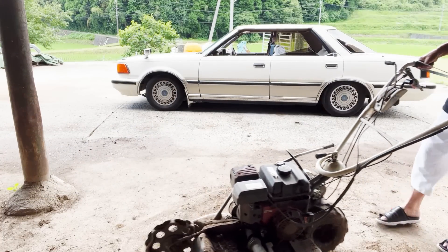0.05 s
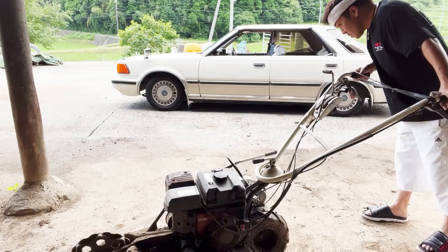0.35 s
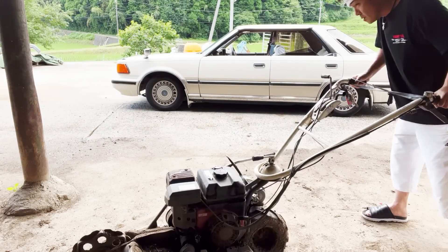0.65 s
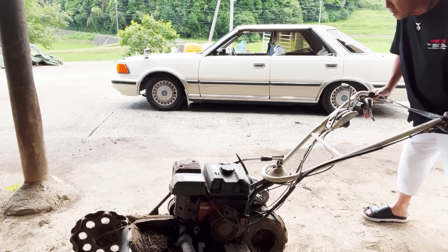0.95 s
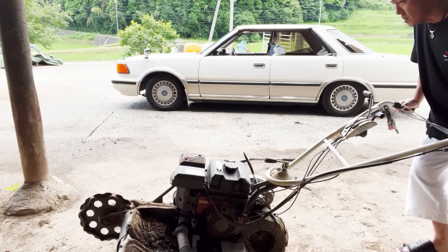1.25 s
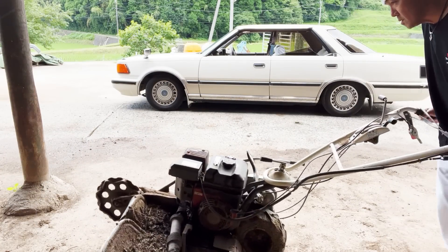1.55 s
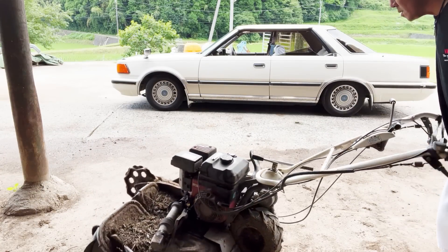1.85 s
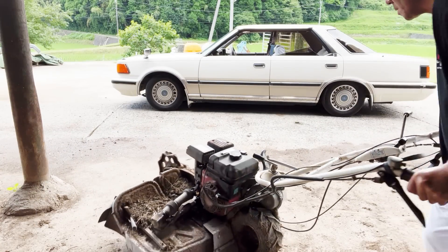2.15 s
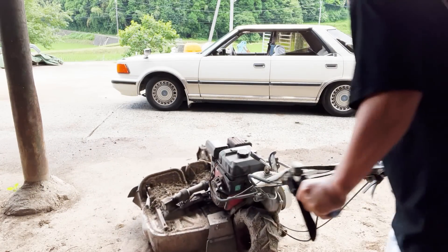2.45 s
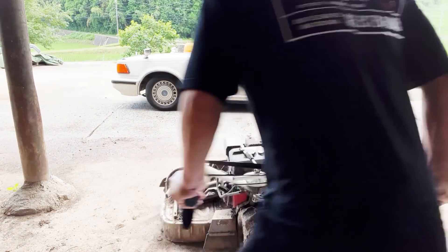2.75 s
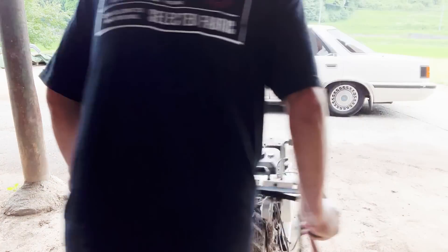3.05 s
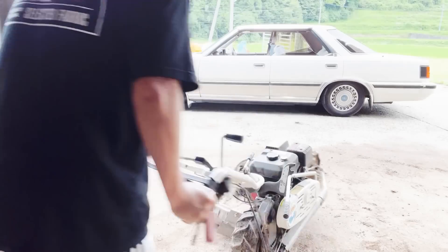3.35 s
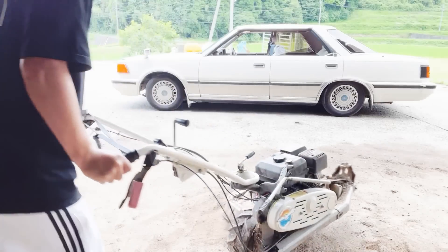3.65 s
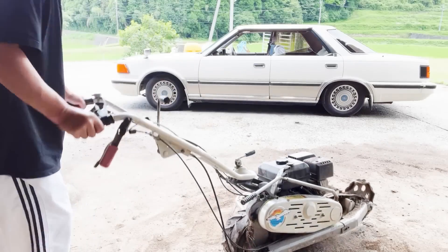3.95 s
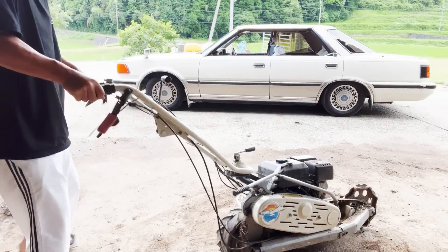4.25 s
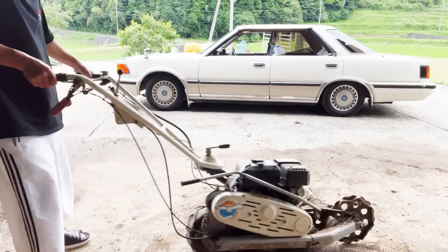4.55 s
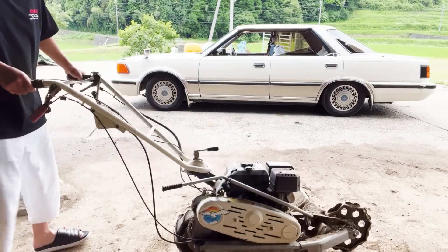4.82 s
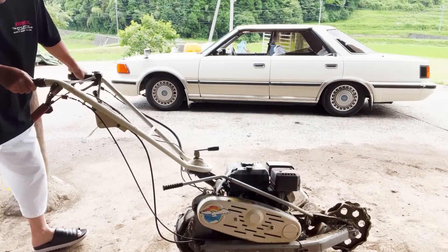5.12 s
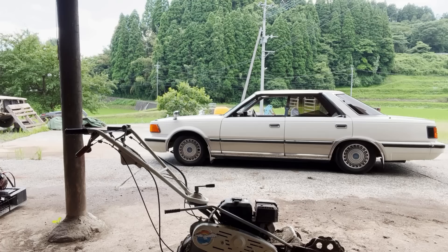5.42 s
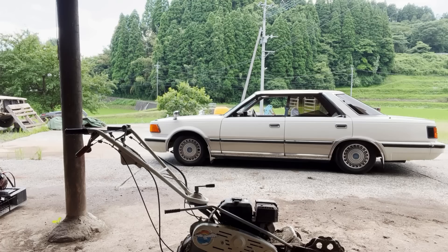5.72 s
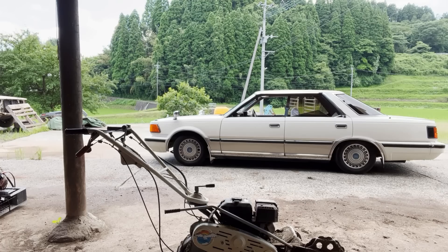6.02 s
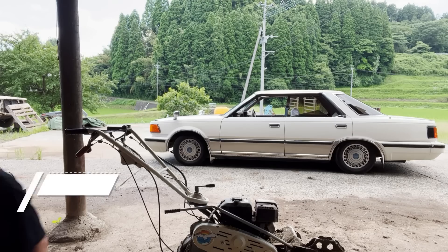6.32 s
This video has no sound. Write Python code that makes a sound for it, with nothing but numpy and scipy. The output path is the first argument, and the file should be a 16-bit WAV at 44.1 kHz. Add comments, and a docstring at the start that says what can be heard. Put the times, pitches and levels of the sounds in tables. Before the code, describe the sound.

Hollow sheet metal knocks, steel clanks and crunching sand as an unpowered tiller is shoved and turned in an open shed.

```python
"""A heavy walk-behind tiller, engine off, is pushed and turned by hand on the gritty concrete of an open farm
shed, while a far engine drones. The first shove makes its metal hood knock and its frame clank; the sound drops
away for a moment and a bird calls. More knocks follow, then a slow, quiet turn with sandals scuffing and grit
cracking under the tyres. After four seconds come the hardest jolts: the hood flexes and a lever pings. Near the
end something on hard wheels rolls closer, squealing faintly."""
import sys
import numpy as np
from scipy import signal
from scipy.fft import rfft, irfft, next_fast_len
from scipy.io import wavfile
from scipy.ndimage import uniform_filter1d

SR = 44100
rng = np.random.default_rng(int(sys.argv[2]) if len(sys.argv) > 2 else 0)


def waveform_to_disk(signal):
    """Save audio, clipped to [-1, 1], as 16-bit WAV at the path in sys.argv[1]."""
    frames = np.transpose(np.atleast_2d(signal))
    scaled = np.clip(frames, -1, 1) * 32767
    samples = np.round(scaled).astype(np.int16)
    wavfile.write(sys.argv[1], SR, samples)


N = 285759
TIME = np.arange(N) / SR   # seconds since the scene began
AGE = np.arange(SR * 3 // 5) / SR   # seconds since one hit began

# the hood knocks on its mounts: t/s, level/dB, f/Hz
HOOD_KNOCKS = [(0.026, -16.5, 315), (0.068, -21, 396), (0.147, -20.5, 254), (0.242, -24.5, 641),
               (0.546, -21, 280), (0.666, -22.5, 293), (0.718, -20, 266), (0.824, -24.5, 283),
               (1.316, -31.5, 479), (2.767, -28, 527), (2.808, -24.5, 239), (2.811, -33.5, 516),
               (2.856, -28, 562), (2.883, -17.5, 214), (2.907, -17.5, 237), (2.939, -17.5, 218),
               (3.577, -39, 578), (3.612, -27.5, 480), (3.625, -25.5, 202), (3.732, -27, 522),
               (3.761, -22.5, 242), (4.095, -19, 635), (4.283, -28, 371), (4.411, -9.5, 227),
               (4.466, -22, 277.6), (4.596, -18, 280), (4.676, -17.5, 324), (4.724, -10.5, 289),
               (4.761, -16, 485), (4.8, -13, 294), (5.013, -23.5, 542), (5.017, -25, 293),
               (5.067, -26.5, 278)]
# the notes the hood rings with: f/Hz, level/dB, fade/s (time to fall by 60 dB, called t60 below)
HOOD_NOTES = [(177, -3, 0.28), (216.1, -2.5, 0.42), (258.2, -3, 0.32), (277, 0.5, 0.36), (314.8, 1, 0.32),
              (372, -9, 0.27), (483.4, -3, 0.3), (507, -4, 0.27), (593.5, 2, 0.27), (643, -4.5, 0.26)]
# the tone of a dull thud, from bass to treble: f/Hz, level/dB
THUD_TONE = [(60, -25.5), (125, -10), (190, -10.5), (300, 6.5), (400, 4), (580, -9), (800, -7.5),
             (1300, -19), (3000, -45.5), (16000, -66)]
def hood():
    """Dull knocks set the sheet metal booming; the open panel gives off little bass."""
    out = np.zeros((2, N))
    strike = ringing(HOOD_NOTES, spread_db=4.5, focus_db=7.5, detune=0.0254)
    slap = bursts(THUD_TONE, ripple_db=1, t60=0.063, tail_t60=0.24, clump_db=9)
    for s, db, hz in HOOD_KNOCKS:
        swings = 10.8 * from_db(-0.38 * db)   # harder knocks are choked sooner
        thud = from_db(-7.5) * thump(hz, t60=swings / hz, rise_s=0.0032)
        boom = from_db(-16 - 0.17 * db) * strike(hz)   # and leave a smaller share of boom
        add(out, s, from_db(db) * (thud + boom + from_db(-12) * slap(tail_db=-33.5)))
    return high_pass(out, hz=132)


# heavy jolts bend the hood: t/s, level/dB, start f/Hz, end f/Hz, length/s
HOOD_FLEXES = [(0.595, -23.5, 341, 303, 0.034), (0.641, -21, 306, 280, 0.024),
               (3.658, -33, 285, 263, 0.083), (4.406, -10.5, 460, 248, 0.0049),
               (4.553, -5.5, 544, 452, .005), (4.567, -11, 313, 293, 0.005), (4.59, -6.5, 920, 380, 0.0049),
               (4.599, -9.5, 755, 374, 0.0071), (4.61, -6, 613, 534, 0.0053),
               (4.618, -7.5, 666, 328, 0.0046), (4.668, -8, 660, 527, 0.012), (4.714, -7, 660, 537, 0.0098)]
def flexes():
    """The hood's panel gives way in a few swings that drop in pitch, then booms on."""
    out = np.zeros((2, N))
    strike = ringing(HOOD_NOTES, spread_db=0, focus_db=4.5, detune=0.026)
    for s, db, start_hz, end_hz, length_s in HOOD_FLEXES:
        progress = AGE / length_s
        hz = start_hz + (end_hz - start_hz) * np.minimum(progress, 1) ** 2
        swell = (1 - np.exp(-AGE / 0.0019)) / (1 + progress ** 10)
        swing = swell * np.sin(2 * np.pi * np.cumsum(hz) / SR + rng.uniform(0, 2 * np.pi, (2, 1)))
        boom = from_db(-18) * strike(end_hz)
        add(out, s, from_db(db) * (swing * from_db([[0], [-5]]) + boom))
    return high_pass(out, hz=143.6)


# steel parts hit each other: t/s, level/dB, f/Hz, hardness/dB (how strong the crack is)
FRAME_CLANKS = [(0.03, -16.5, 887, -13), (0.028, -17, 2180, -20), (0.031, -18.5, 1320, -23),
                (0.058, -22.5, 2430, -7.5), (0.067, -16, 970, -25), (0.067, -28, 2125, -23),
                (0.159, -26.5, 960, -13), (0.212, -35, 2820, -6), (0.244, -35, 1000, -24),
                (0.545, -21, 880, -29), (0.578, -17, 827, -29.5), (0.614, -23.5, 880, -41),
                (1.318, -44, 754, -10), (2.253, -42.5, 1085, -21), (2.364, -30, 906, -7.5),
                (2.376, -46.5, 1430, -4), (3.143, -39.5, 1290, 0.5), (3.152, -35.5, 1790, 0),
                (3.186, -36, 850, -7), (4.035, -17.5, 877, -4.5), (4.05, -16.5, 2230, -6.5),
                (4.066, -19, 1470, 0), (4.096, -14.5, 820, -14), (4.163, -30.5, 2100, -6),
                (4.222, -34, 1570, -2.5), (4.364, -17, 835, -7), (4.506, -17.5, 2040, -3),
                (4.541, -16, 1033, -21), (4.552, -19, 1250, -29), (4.59, -20, 1250, -2),
                (4.596, -17, 946, -9.5), (4.669, -14.5, 1440, -42), (4.713, -18, 1350, -36),
                (4.754, -19, 1360, -8)]
# the notes of the frame and of its thin steel guards: f/Hz, level/dB, fade/s
FRAME_NOTES = [(814.5, 8, 0.1), (924, -2, 0.27), (1160, -8, 0.1), (1265, -8, .4), (1391, -3, 0.41),
               (1654, -16, 1), (1903, -15.5, 0.41), (2260, -4, 0.15), (2365, -6, 0.25), (2606, -11, 0.2),
               (3690, -12, 0.69), (5460, -15.5, 0.45)]
GUARD_NOTES = [(2090, -3, .9), (2890, 2, 1.1), (3640, -1, 1.0), (6013, -9, 1.0)]
# the tones of a clang and of a sharp crack: f/Hz, level/dB
CLANG_TONE = [(200, -9.5), (600, -4), (900, -9), (1400, -11), (2250, -14), (2800, -16), (8000, -46),
              (16000, -64)]
CRACK_TONE = [(300, 12.5), (1500, 3.5), (2300, 4), (3000, -2.5), (3800, 2.5), (5200, -1.5), (8000, -1.5),
              (11000, -11), (15500, -22)]
def frame():
    """Steel on steel: a crack, a short clonk where the parts meet, then the tubes and guards ring on."""
    out = np.zeros((2, N))
    strike = ringing(FRAME_NOTES, spread_db=13.5, focus_db=19, detune=0.025)
    clang = bursts(CLANG_TONE, ripple_db=-1, t60=0.078, tail_t60=1, clump_db=9)
    crack = bursts(CRACK_TONE, ripple_db=6.5, t60=0.1, tail_t60=0.27, clump_db=17.5)
    sing = ringing(GUARD_NOTES, spread_db=4, detune=0.011)
    for s, db, hz, hardness_db in FRAME_CLANKS:
        ring = from_db(-9.5) * strike(hz) + from_db(-3) * clang(tail_db=-14)
        clonk = from_db(-6.5) * thump(hz, t60=0.028, rise_s=0.00024)
        body = clonk + from_db(-7 + 0.24 * hardness_db) * ring   # harder hits leave more ring
        snap = crack(tail_db=-6.5)
        guards = from_db(-16 + 0.7 * db) * sing() * buzz(size=300)   # weak clanks barely stir them
        add(out, s, from_db(db) * (body + from_db(hardness_db - 1.5) * (snap + guards)))
    return high_pass(out, hz=198)


# shoves (the long, faint one is a slow turn): t/s, build-up/s, hold/s, shudder level/dB, grit level/dB
TILLER_SHOVES = [(0.0, 0.0006, .13, -24.5, -43.5), (0.325, 0.18, 0.15, -34.5, -68),
                 (1.309, 0.011, 0.016, -41.5, -66), (1.302, 0.46, 1, -57.5, -69),
                 (2.73, 0.16, 0.028, -27, -46.5), (3.558, 0.051, 0.071, -28, -51.5),
                 (3.814, 0.066, 0.56, -37, -57), (4.117, 0.26, 0.34, -23.5, -35),
                 (4.994, 0.016, 0.0076, -47, -49)]
def motion():
    """Each shove builds up, holds and coasts to rest; gives the strength of the shudder and the grit."""
    build_up_db, shudder_fall_db_per_s, grit_fall_db_per_s = 20, 91, 99
    t = TIME[::40]
    levels = []
    for s, build_s, hold_s, shudder_db, grit_db in TILLER_SHOVES:
        effort_db = np.interp(t, [s, s + build_s], [-build_up_db, 0], left=-np.inf)
        coasting_s = np.maximum(t - s - build_s - hold_s, 0)
        levels.append([effort_db + shudder_db - shudder_fall_db_per_s * coasting_s,
                       effort_db + grit_db - grit_fall_db_per_s * coasting_s])
    return [np.interp(TIME, t, from_db(db)) for db in np.max(levels, axis=0)]


# the tone of sand ground under the tyres: f/Hz, level/dB
TYRE_GRIT_TONE = [(150, -1.5), (500, 22.5), (1000, 16.5), (1600, 11), (2300, 7), (2900, 6.5), (3900, 4.5),
                  (5500, 0), (7500, -0.5), (11000, -11.5), (15500, -15.5)]
def rolling(damping=2.43):
    """The knobbly tyres grind sand and shake the hood and frame, whose rubbing joints cut the ring short."""
    shudder, sand = motion()
    jolts = grains(per_s=200, spread_db=4)

    def shaken(notes):
        ring = ringing(np.array(notes) / [1, 1, damping], spread_db=1)()[:, :SR // 4]
        return even(rms_one(signal.oaconvolve(jolts, ring, axes=1)[:, :N]))
    body = from_db(-10) * shaken(HOOD_NOTES) + from_db(-8.5) * even(colour(jolts, THUD_TONE))
    body += from_db(-34.5) * shaken(FRAME_NOTES)
    grit = grains(per_s=1600, spread_db=2.5) + 0.96 * rng.standard_normal((2, N))
    return high_pass(shudder * body, hz=88) + from_db(6) * sand * colour(grit, TYRE_GRIT_TONE)


# a loose lever hits its stop, a control rod its guide: t/s, level/dB, f/Hz, focus on f/(dB per octave)
LEVER_PINGS = [(4.3585, -17.5, 6400, 2), (4.5035, -19, 4020, 17)]
ROD_SNAPS = [(0.738, -23.5, 1200, 1)]
# the notes of each: f/Hz, level/dB, fade/s
LEVER_NOTES = [(1925, 3.5, 0.051), (4120, -8.5, 0.14), (4000, -0.5, 0.039), (4240, -5, 0.035),
               (6510, -4, 0.037), (7800, -6, 0.05)]
ROD_NOTES = [(1023, 1, 0.08), (1380, -4, 0.11), (1556, 0, 0.14), (1680, -6, 0.09), (2330, -8, 0.09),
             (3080, -14, .32), (7700, -10, 0.05)]
def clinks(hits, notes, crack_db, rise_s):
    """A loose steel part chatters into place: its ring builds up, and its changing grip blurs the pitch."""
    out = np.zeros((2, N))
    clack = bursts(CRACK_TONE, ripple_db=0, t60=0.055, tail_t60=0.27, clump_db=3)
    rise = 1 - np.exp(-(AGE / rise_s) ** 2)
    for s, db, pitch_hz, focus_db in hits:
        ring = 0
        for hz, note_db, t60 in notes:
            strength = from_db(note_db - focus_db * abs(np.log2(hz / pitch_hz)))
            wobbly_time = np.cumsum(1 + 0.016 * buzz(size=130), axis=1) / SR
            ring += strength * decay(t60) * np.sin(2 * np.pi * hz * wobbly_time)
        crack = from_db(crack_db) * clack(tail_db=-14.5) * rise
        add(out, s, from_db(db) * (peak_one(ring * rise) + crack))
    return out


# the biggest stones crack under the tyres: t/s, level/dB
STONE_CRACKS = [(0.104, -28.5), (0.2403, -37.5), (0.4895, -46), (0.506, -41.5), (0.518, -55), (0.54, -52),
                (0.696, -46.5), (1.359, -50), (1.8, -53), (2.284, -47.5), (2.744, -50), (2.765, -37),
                (2.808, -32), (3.5735, -44), (4.317, -35.5), (5.1903, -43.5)]
# the tone of one crack: f/Hz, level/dB
STONE_TONE = [(300, -1), (2500, 4), (5500, 1), (8500, 3.5), (15500, -4)]
def stones():
    """Single stones burst with a dry crack, each a little brighter or duller, and scatter some sand."""
    out = np.zeros((2, N))
    scatter = from_db(-15) * decay(t60=0.4)
    shape = (1 - np.exp(-AGE / 0.00059)) * (decay(t60=0.021) + scatter)
    for s, db in STONE_CRACKS:
        tone = [(hz, level_db + 2 * rng.standard_normal()) for hz, level_db in STONE_TONE]
        add(out, s, from_db(db) * peak_one(noise(tone, len(AGE)) * shape))
    return out


# sandals and wheels scuff the sand: t/s, level/dB, rise/s, rasp f/Hz
SAND_SCUFFS = [(0.0, -36, 0.022, 3570), (1.008, -57, 0.024, 5200), (1.443, -51, 0.015, 3900),
               (1.925, -52.5, 0.0076, 3660), (2.017, -52.5, 0.03, 4530), (2.054, -50.5, 0.0044, 3000),
               (2.333, -47.5, 0.035, 3680), (2.79, -38, 0.032, 6840), (3, -42, 0.015, 5830),
               (3.566, -51, 0.041, 4270), (3.64, -44, 0.032, 6260), (3.893, -45.5, 0.019, 2920),
               (5.435, -42.5, 0.0091, 3600), (5.469, -41, 0.0068, 5200), (5.535, -43.5, .007, 4240),
               (5.565, -43.5, 0.0074, 5350), (5.705, -47.5, 0.004, 3270), (5.771, -45, 0.005, 5450)]
# loose sand stirs underfoot: t/s, level/dB
SAND_STIR = [(0, -40), (1.15, -78.5), (1.6, -62), (2.5, -70), (3.45, -67), (5.2, -66), (5.3, -87)]
# the tone of crunching sand: f/Hz, level/dB
SAND_TONE = [(300, 3), (1500, 2.5), (2500, 0.5), (4000, -1), (5500, -6.5), (8000, -1), (11500, -3.5),
             (15500, -11.5)]
def scuffs():
    """Dragged sand crunches in a swell of grains, rasping at first; loose sand crackles in between."""
    out = in_time(SAND_STIR)[0] * colour(grains(per_s=2200, spread_db=-1), SAND_TONE)
    crunch = colour(grains(per_s=1300, spread_db=-3), SAND_TONE)
    for s, db, rise_s, hz in SAND_SCUFFS:
        progress = AGE / rise_s
        swell = progress * np.exp(1 - progress)
        at = rng.integers(N - len(AGE))
        sand = crunch[:, at:at + len(AGE)]
        rasp = from_db(-4) * resonate(sand, hz, width_hz=800) * decay(t60=0.3)
        add(out, s, from_db(db) * swell * (from_db(-3) * sand + rasp))
    return out


# small loose parts: f/Hz, level/dB
RATTLING_PARTS = [(1200, -6.5), (2300, -3.5), (3600, -5.5)]
def rattles(taps_per_s=11, spread_db=17):
    """Cables, clips and bolts tap the frame at random, harder when the tyres grind more sand."""
    _, sand = motion()
    strike = ringing(FRAME_NOTES, spread_db=7, focus_db=13.5)
    clang = bursts(CLANG_TONE, ripple_db=12, t60=0.026, tail_t60=0.22, clump_db=-6.5)
    out = np.zeros((2, N))
    for hz, db in RATTLING_PARTS:
        tick = peak_one(strike(hz) * decay(t60=0.12) + from_db(-2) * clang(tail_db=-15))[:, :SR // 8]
        taps = np.flatnonzero(rng.random(N) < taps_per_s / SR)
        for at, size in zip(taps, rng.uniform(-1.2, 1, N)[taps]):
            add(out, at / SR, sand[at] * from_db(db + spread_db * size) * tick)
    return out


# the latch moves: t/s, level/dB
LATCH_TICKS = [(0.16, -32), (0.815, -36), (0.857, -40)]
# the tone of one tick: f/Hz, level/dB
LATCH_TONE = [(500, 12), (5500, 0), (8300, 7.5), (10000, 9), (15500, 7)]
def latch():
    """A small, hard latch hits its catch with a crisp, dry tick."""
    out = np.zeros((2, N))
    tick = bursts(LATCH_TONE, ripple_db=0, t60=0.0089, tail_t60=0.12, clump_db=4)
    for s, db in LATCH_TICKS:
        add(out, s, from_db(db) * tick(tail_db=-27))
    return out


# the level of the tiller's sounds dips suddenly, then recovers: t/s, volume (0 to 1)
TILLER_PAUSE = [(.256, 1), (.259, .02), (.39, .05), (.48, 1)]
def tiller():
    """All the sounds of moving the tiller, with the shed's echo."""
    lever = clinks(LEVER_PINGS, LEVER_NOTES, crack_db=-8, rise_s=0.0034)
    rod = clinks(ROD_SNAPS, ROD_NOTES, crack_db=-8, rise_s=0.0011)
    controls = lever + rod + latch()
    booming = (hood() + flexes()) * from_db([[0], [-3]])   # the hood is close and straight ahead
    parts = booming + frame() + controls + stones() + scuffs() + rolling() + rattles()
    return high_pass(shed(parts), hz=45.2) * np.interp(TIME, *np.transpose(TILLER_PAUSE))


# the hard wheels come closer: t/s, rumble level/dB, grit level/dB
WHEEL_APPROACH = [(5.424, -57, -56), (5.444, -50, -56.5), (5.664, -52.5, -58.5), (5.722, -43, -54.5),
                  (5.86, -61.5, -63), (5.96, -54.5, -54.5), (6.116, -34.5, -47), (6.222, -29, -39),
                  (6.48, -25.5, -36.5)]
# they jolt over joints in the floor: t/s, level/dB
WHEEL_JOLTS = [(6.193, -26.5), (6.226, -26.5), (6.376, -25)]
# the notes that ring along with them: f/Hz, width/Hz, level/dB
WHEEL_NOTES = [(163, 30, -11), (431, 24, -12), (482, 13, -7)]
# the tones of their rumble and of the sand under them: f/Hz, level/dB
RUMBLE_TONE = [(30, -52), (70, 1.5), (140, 1.5), (230, -0.5), (600, -1), (1100, 1), (2000, -12),
               (4000, -43), (16000, -69)]
WHEEL_GRIT_TONE = [(150, -27), (600, 6), (1200, 1), (2350, 1.5), (2800, 1), (5500, -1), (7000, 2),
                   (11000, -2.5), (15500, -10)]
def hard_wheels():
    """Hard wheels drum on the rough floor, crunch sand, jolt over joints and set a few notes singing."""
    rumble, sand = in_time(WHEEL_APPROACH)
    bumps = grains(per_s=600, spread_db=1)
    singing = sum(from_db(db) * even(resonate(bumps, hz, width)) for hz, width, db in WHEEL_NOTES)
    grit = grains(per_s=1400, spread_db=4.5) + 1.2 * rng.standard_normal((2, N))
    crunch = colour(grit, WHEEL_GRIT_TONE, ripple_db=3)
    drumming = from_db(-5.5) * colour(bumps, RUMBLE_TONE, ripple_db=2)
    out = rumble * (drumming + singing) + from_db(6.5) * sand * patches() * crunch
    for s, db in WHEEL_JOLTS:
        jolt = noise(RUMBLE_TONE, len(AGE)) + noise(WHEEL_GRIT_TONE, len(AGE))
        add(out, s, from_db(db) * peak_one(jolt * decay(t60=0.23)))
    return out


def patches(per_s=26, spread_db=1.5):
    """The volume wanders at random as the wheels cross thick and thin sand."""
    times = np.arange(0, TIME[-1] + 1, 1 / per_s)
    return from_db(spread_db * np.interp(TIME, times, rng.standard_normal(len(times))))


# the axles of the hard wheels squeal: loudest t/s, level/dB, f/Hz
AXLE_SQUEALS = [(6.25, -41, 4510), (6.38, -41.5, 4840), (6.39, -40.5, 2350)]
def squeals(swell_s=0.046):
    """A dry axle sings thinly for part of a turn."""
    out = np.zeros((2, N))
    for s, db, hz in AXLE_SQUEALS:
        swell = np.exp(-((TIME - s) / swell_s) ** 2 / 2)
        out += from_db(db) * swell * even(resonate(rng.standard_normal((2, N)), hz, width_hz=12))
    return out


# a far bird calls: t/s, level/dB
BIRD_CHIRPS = [(0.261, -48), (0.371, -56), (0.399, -45.5)]
def bird(hz=1750):
    """Short rasping notes on one pitch."""
    swell = np.zeros((1, N))
    for s, db in BIRD_CHIRPS:
        add(swell, s, from_db(db) * decay(t60=0.21) * (1 - np.exp(-AGE / 0.00057)))
    rasp = resonate(resonate(rng.standard_normal((2, N)), hz, width_hz=220), hz, width_hz=150)
    return swell * even(rasp, size=500)


# the tone of the outdoor background: f/Hz, level/dB
OUTDOOR_TONE = [(20, -45), (45, -9), (72, 4.5), (110, -10.5), (280, -8.5), (600, -12), (1500, -19.5),
                (4000, -29.5), (8000, -32.5), (16000, -44)]
def outdoors():
    """A steady, faint noise with the low drone of a far engine in it."""
    return from_db(-57.5) * noise(OUTDOOR_TONE, N)


def shed(x, echo_db=-11.5, dull_hz=4640):
    """The roof and posts send back a thin, dull echo."""
    tail = rng.standard_normal((2, len(AGE))) * decay(t60=0.44) * (1 - np.exp(-AGE / 0.00096))
    tail = signal.sosfilt(signal.butter(1, dull_hz, fs=SR, output="sos"), tail)
    tail /= np.sqrt(np.sum(tail ** 2, axis=1, keepdims=True))
    return x + from_db(echo_db) * signal.fftconvolve(x, tail, axes=1)[:, :N]


# how wide the sound is: f/Hz, level/dB of the side compared with the middle
STEREO_WIDTH = [(60, -15.5), (200, -13), (380, -7.5), (700, -2.5), (1300, -2), (2400, 1), (4400, 0),
                (8500, 2.5), (10300, 22.5), (12500, 34), (15000, -27.5)]
def left_right(x):
    """Turn middle and side into left and right: the bass sits in the middle, the treble spreads wide."""
    size = next_fast_len(N)
    ratio = from_db(at_hz(STEREO_WIDTH, np.arange(size // 2 + 1) * SR / size))
    shares = np.array([np.ones_like(ratio), ratio]) / np.sqrt(1 + ratio ** 2)
    mid, side = irfft(rfft(x, size) * shares, size)[:, :N]
    return np.array([mid + side, mid - side])


def ringing(notes, spread_db, focus_db=0, detune=0):
    """Struck metal: each blow remixes the notes, favouring those near its pitch; load shifts the tuning."""
    hz, db, t60 = np.transpose(notes)
    fades = from_db(db[:, None] - 60 * AGE / t60[:, None])

    def strike(pitch_hz=1000):
        shifted_hz = hz * (1 + detune * rng.standard_normal(len(hz)))
        waves = fades * np.sin(2 * np.pi * shifted_hz[:, None] * AGE)
        octaves_away = np.abs(np.log2(hz / pitch_hz))
        strength = from_db(spread_db * rng.standard_normal((2, len(hz))) - focus_db * octaves_away)
        return peak_one((strength * rng.choice([-1, 1], (2, len(hz)))) @ waves)
    return strike


def bursts(tone, ripple_db, t60, tail_t60, clump_db):
    """A hit's crowded notes blur into noise that dies fast, then an uneven tail of tiny bounces."""
    source = noise(tone, 3 * len(AGE), ripple_db)
    head, tail = decay(t60), decay(tail_t60)
    rise = 1 - np.exp(-AGE / 0.00036)
    times = np.linspace(0, AGE[-1], 240)

    def burst(tail_db):
        at = rng.integers(2 * len(AGE))
        bounces = from_db(clump_db * np.clip(rng.standard_normal(len(times)), -2, 2))
        clumps = np.interp(AGE, times, rms_one(bounces))
        return peak_one(source[:, at:at + len(AGE)] * rise * (head + from_db(tail_db) * tail * clumps))
    return burst


def thump(hz, t60, rise_s, side_db=-4):
    """The struck spot swings a few times, heard mostly from straight ahead."""
    phase = np.array([[0], [rng.choice([-1, 1]) * np.pi / 2]])
    swing = np.sin(2 * np.pi * hz * AGE + phase)
    return peak_one(swing * decay(t60) * (1 - np.exp(-AGE / rise_s))) * from_db([[0], [side_db]])


def grains(per_s, spread_db):
    """Tiny clicks of unequal size at random times."""
    sizes = from_db(spread_db * np.minimum(rng.exponential(1, N), 4))
    return rms_one((rng.random(N) < per_s / SR) * sizes * rng.standard_normal((2, N)))


def buzz(size):
    """The uneven grip of a loose part: a random flutter, smoothed over `size` samples."""
    return rms_one(uniform_filter1d(rng.standard_normal((2, len(AGE))), size=size))


def noise(tone, size, ripple_db=0):
    """Two unrelated noises: one for the middle, one for the sides."""
    return colour(rng.standard_normal((2, size)), tone, ripple_db)


def colour(x, tone, ripple_db=0):
    """Give a sound a tone, with the many small peaks and dips of a real object if asked."""
    size = next_fast_len(x.shape[-1])
    hz = np.arange(size // 2 + 1) * SR / size
    peaks_hz = np.cumsum(np.linspace(12, 60, 460))
    heights = rng.standard_normal(len(peaks_hz)) * np.minimum(peaks_hz / 1500, 1)
    gain = from_db(at_hz(tone, hz) + ripple_db * np.interp(hz, peaks_hz, heights))
    return rms_one(irfft(rfft(x, size) * gain, size)[..., :x.shape[-1]])


def resonate(x, hz, width_hz):
    """Make a sound ring around one pitch."""
    r = np.exp(-np.pi * width_hz / SR)
    return rms_one(signal.lfilter([1, 0, -1], [1, -2 * r * np.cos(2 * np.pi * hz / SR), r * r], x))


def high_pass(x, hz):
    """Cut the bass below hz."""
    return signal.sosfilt(signal.butter(3, hz, "high", fs=SR, output="sos"), x)


def decay(t60):
    """Fall by 60 dB in t60 seconds."""
    return from_db(-60 * AGE / t60)


def add(out, s, sound):
    """Mix a sound in at s seconds."""
    at = round(s * SR)
    out[:, at:at + sound.shape[-1]] += sound[..., :N - at]


def in_time(rows):
    """Turn a table of times and levels into volume curves, silent outside those times."""
    s, *columns = np.transpose(rows)
    return [from_db(np.interp(TIME, s, db, left=-120, right=-120)) for db in columns]


def at_hz(points, hz):
    """Read a table's level at any frequency."""
    known_hz, db = np.transpose(points)
    return np.interp(np.log(hz + 1), np.log(known_hz), db)


def even(x, size=2200):
    """Hold the level steady over stretches of `size` samples."""
    return x / np.sqrt(np.abs(uniform_filter1d(x ** 2, size)) + 1e-6)


def rms_one(x):
    """Scale the average strength (rms) to 1."""
    return x / np.sqrt(np.mean(x ** 2, axis=-1, keepdims=True) + 1e-20)


def peak_one(x, size=256):
    """Scale the loudest few milliseconds to strength 1."""
    return x / np.sqrt(uniform_filter1d(x ** 2, size, mode="constant").max(axis=-1, keepdims=True))


def from_db(db):
    """Turn decibels into a number to multiply by."""
    return 10 ** (np.asarray(db) / 20)


def scene():
    """Everything is built as a middle and a side signal, then turned into left and right."""
    return left_right(tiller() + hard_wheels() + squeals() + bird() + outdoors())


def record(dry):
    """Round off the highest peaks and cut the very top of the treble."""
    treble_cut = signal.ellip(10, 0.2, 80, 15750, fs=SR, output="sos")
    return signal.sosfilt(treble_cut, np.tanh(dry))


dry = scene()
out = record(dry)
waveform_to_disk(out)
```